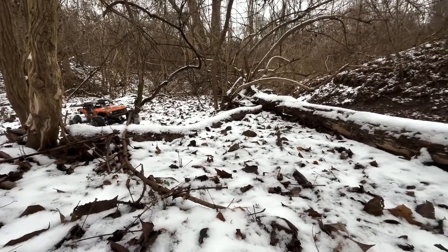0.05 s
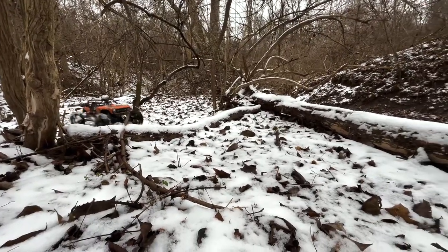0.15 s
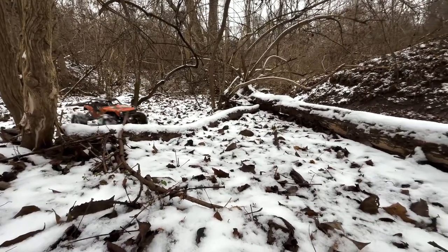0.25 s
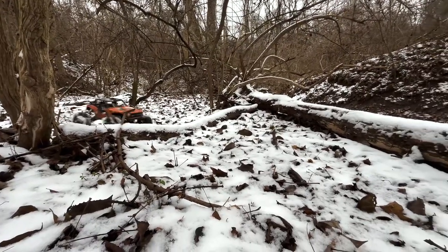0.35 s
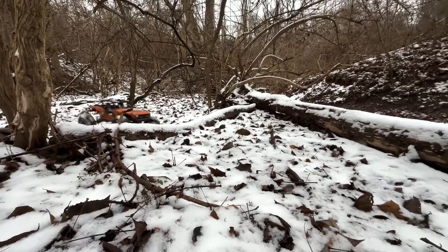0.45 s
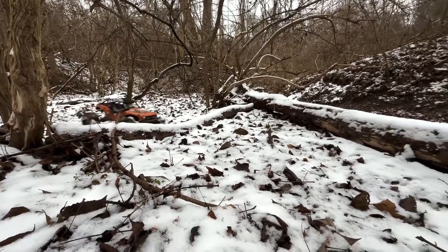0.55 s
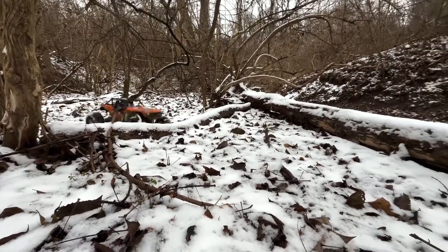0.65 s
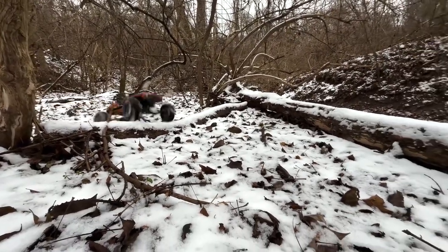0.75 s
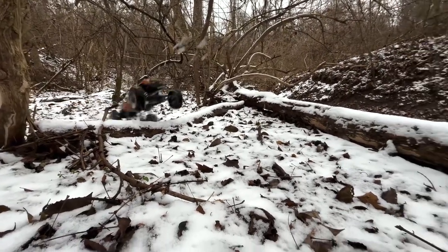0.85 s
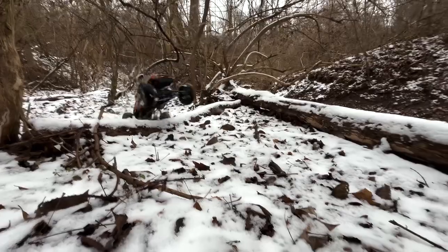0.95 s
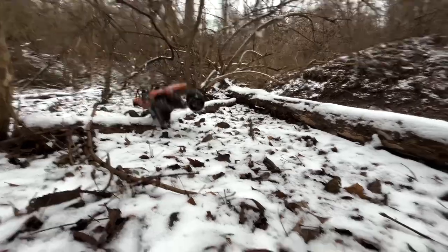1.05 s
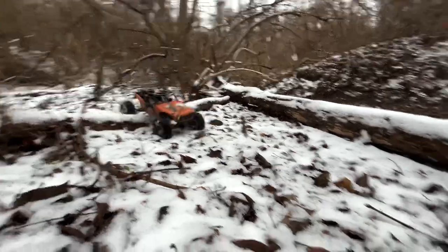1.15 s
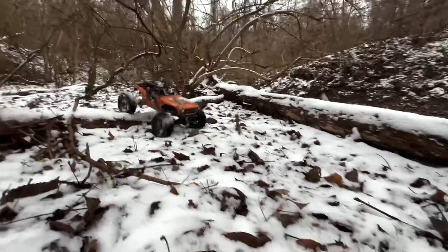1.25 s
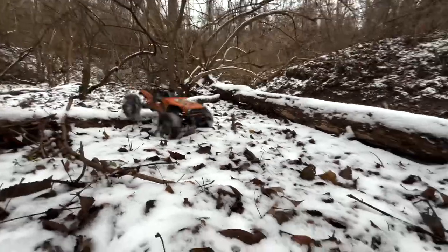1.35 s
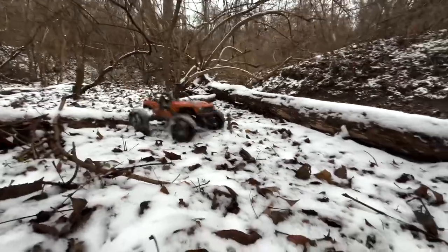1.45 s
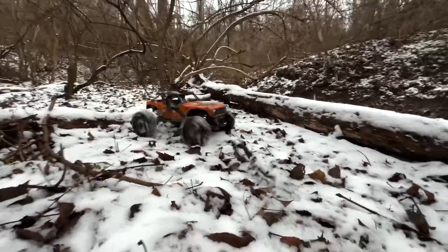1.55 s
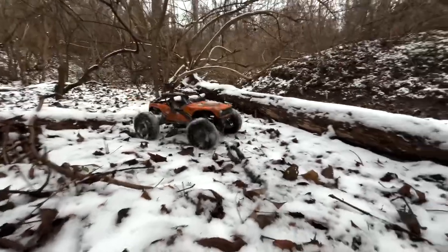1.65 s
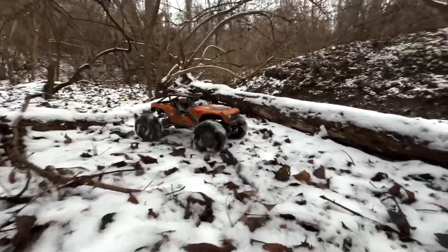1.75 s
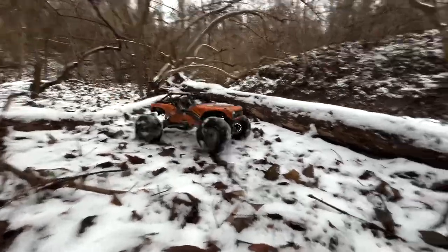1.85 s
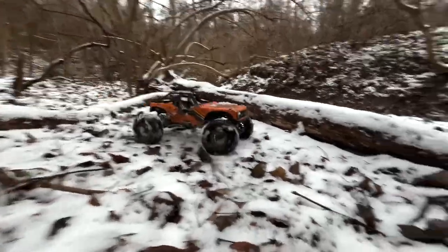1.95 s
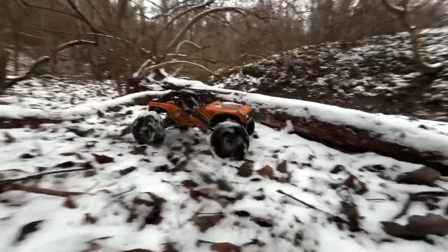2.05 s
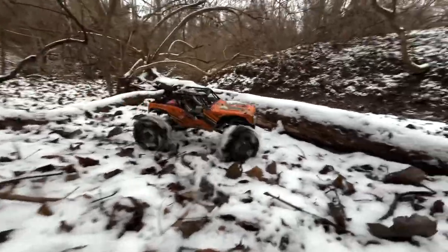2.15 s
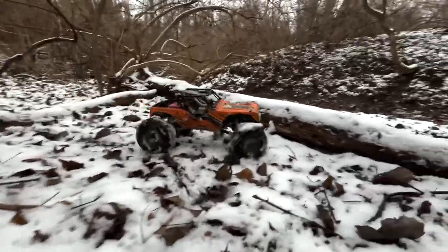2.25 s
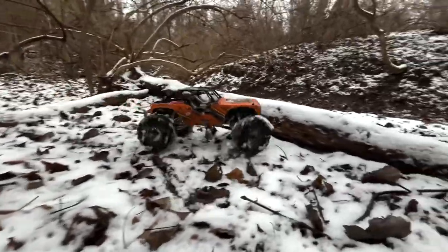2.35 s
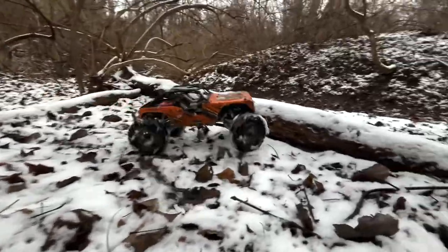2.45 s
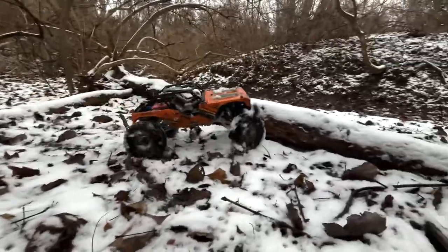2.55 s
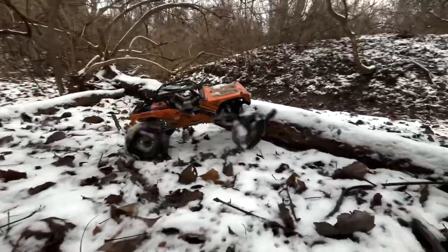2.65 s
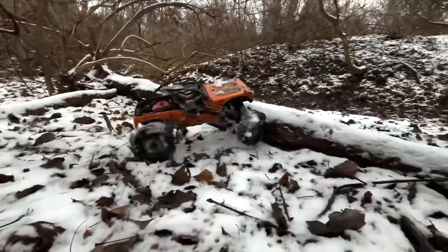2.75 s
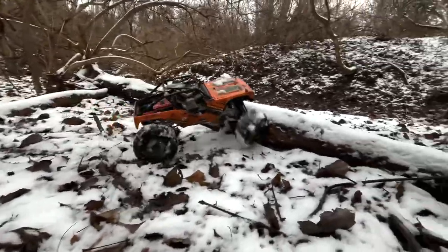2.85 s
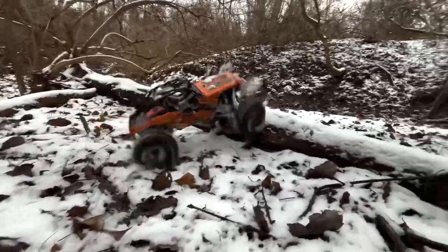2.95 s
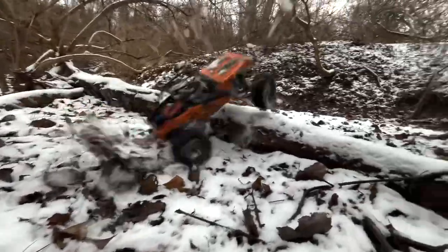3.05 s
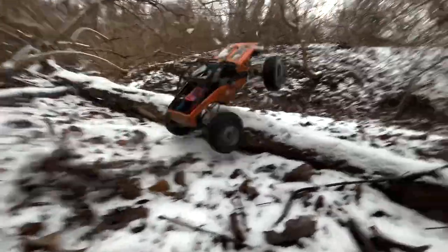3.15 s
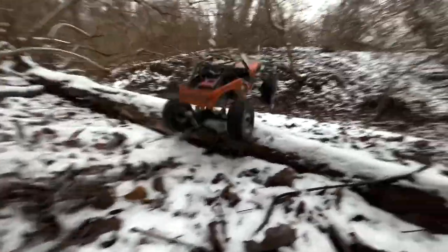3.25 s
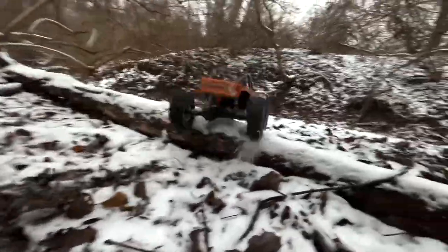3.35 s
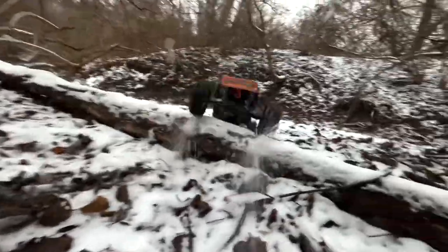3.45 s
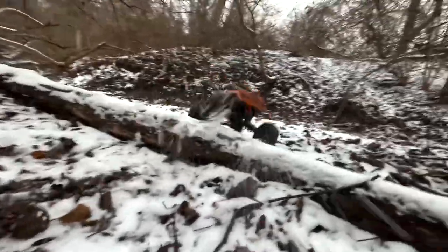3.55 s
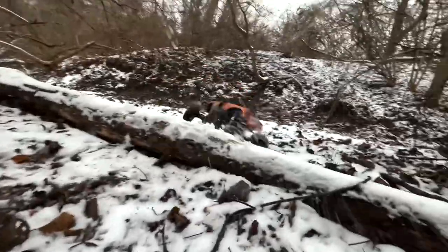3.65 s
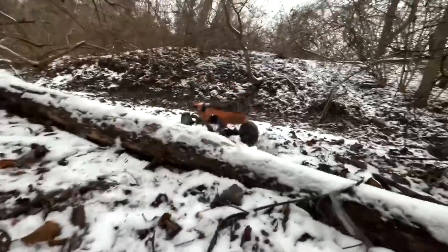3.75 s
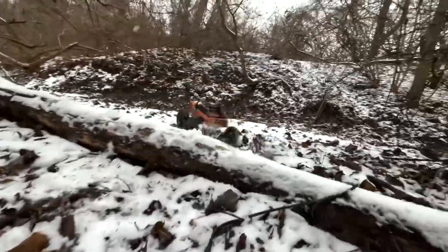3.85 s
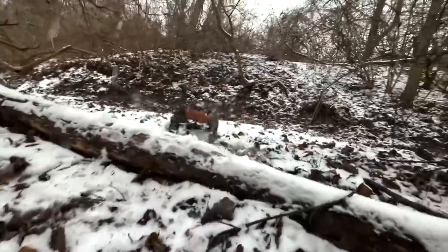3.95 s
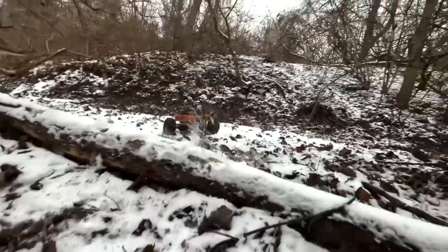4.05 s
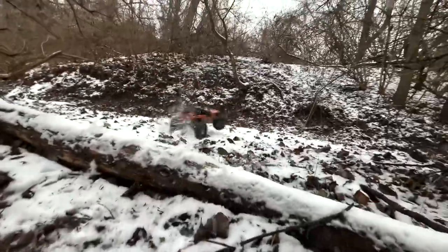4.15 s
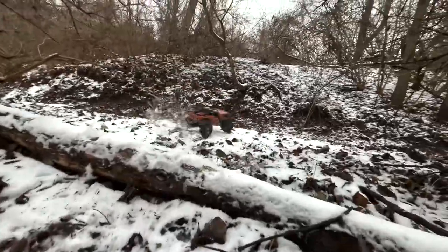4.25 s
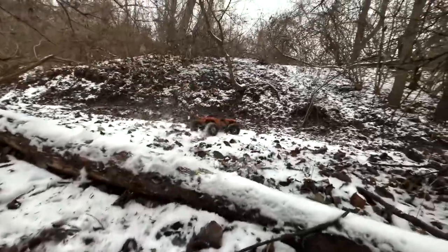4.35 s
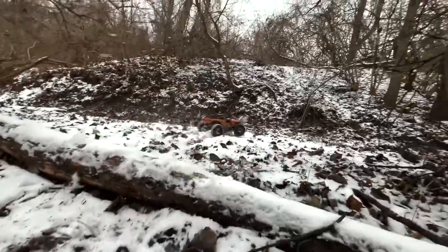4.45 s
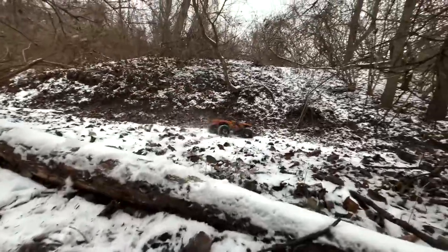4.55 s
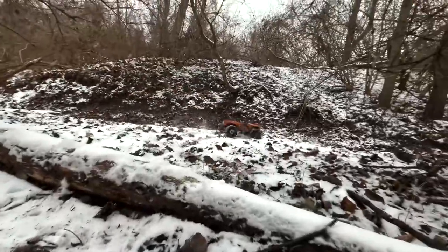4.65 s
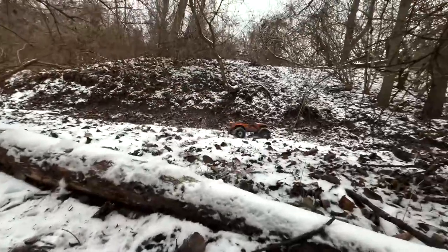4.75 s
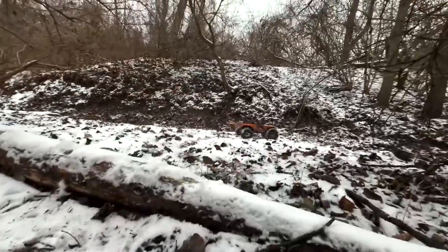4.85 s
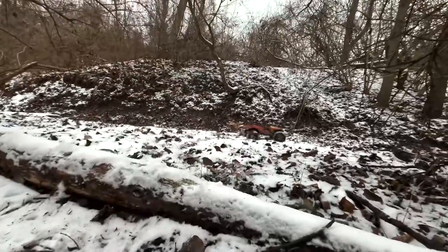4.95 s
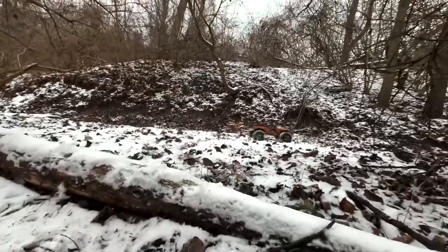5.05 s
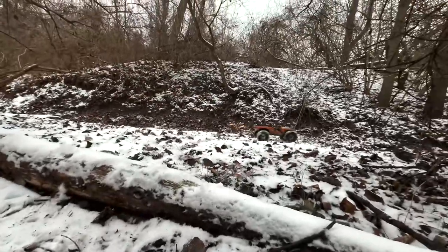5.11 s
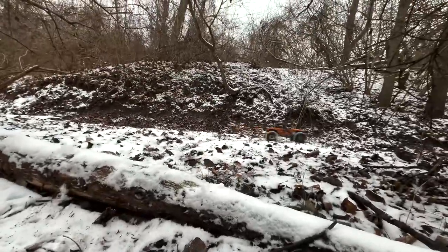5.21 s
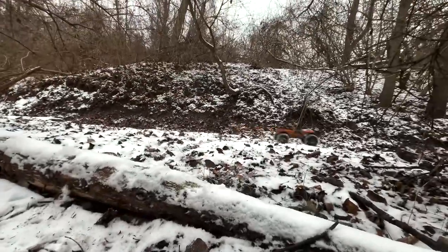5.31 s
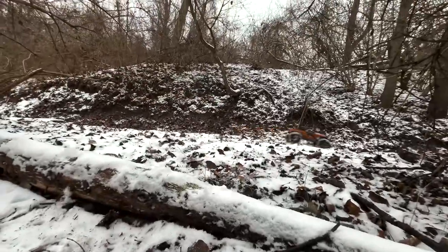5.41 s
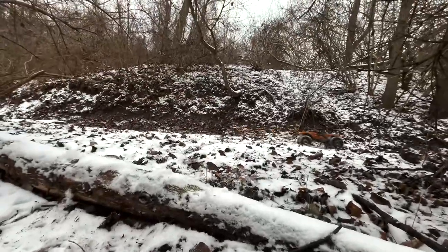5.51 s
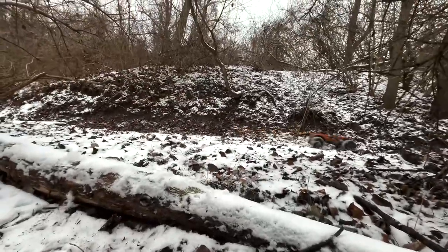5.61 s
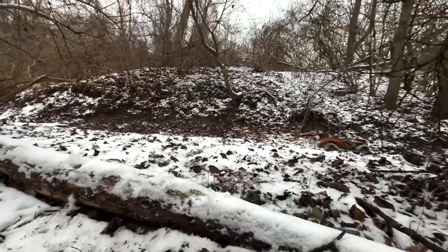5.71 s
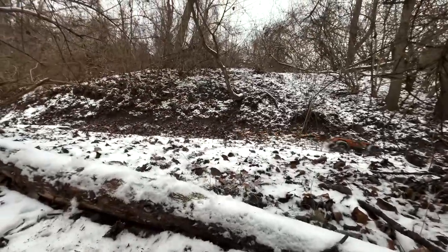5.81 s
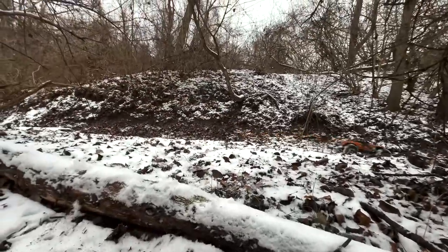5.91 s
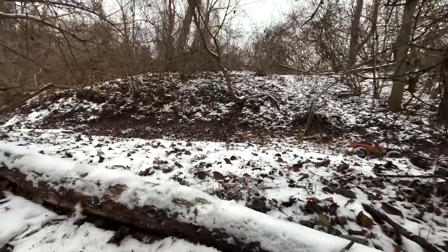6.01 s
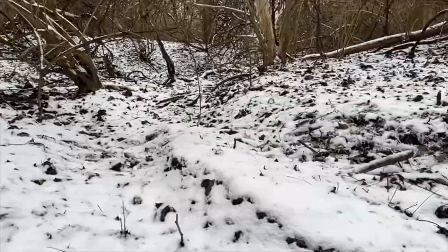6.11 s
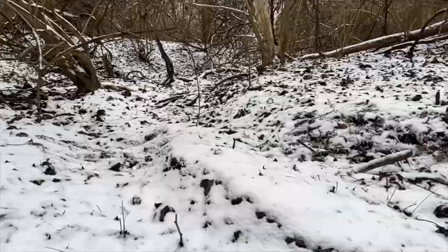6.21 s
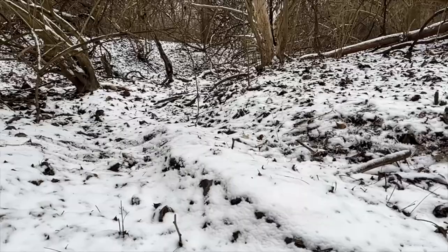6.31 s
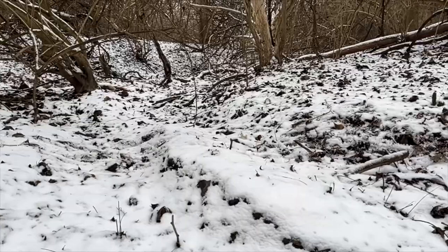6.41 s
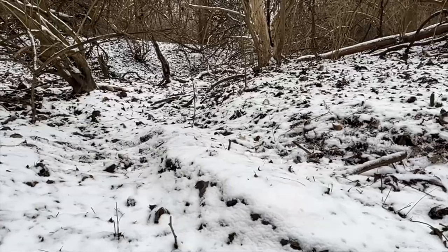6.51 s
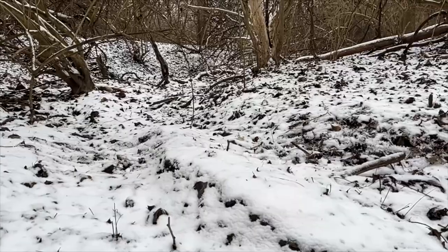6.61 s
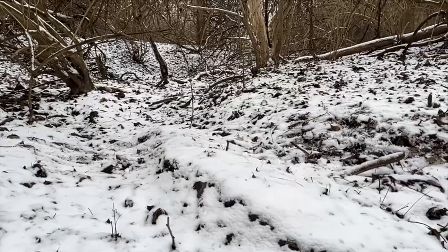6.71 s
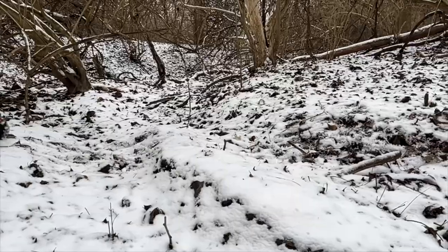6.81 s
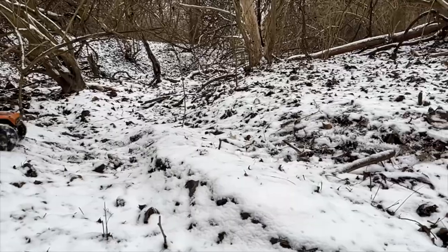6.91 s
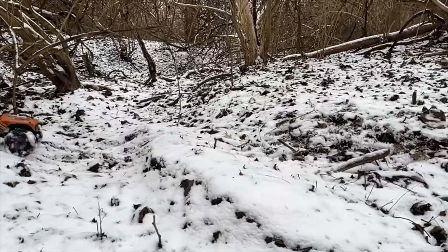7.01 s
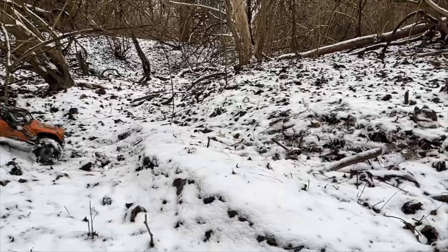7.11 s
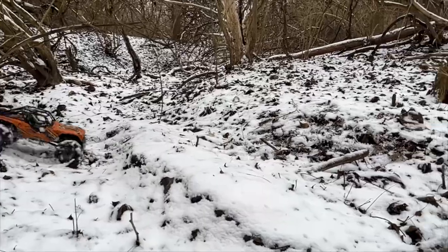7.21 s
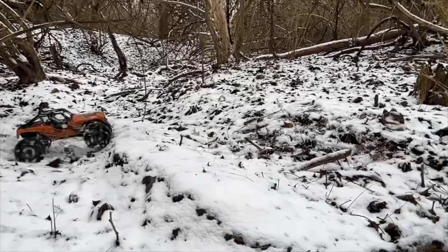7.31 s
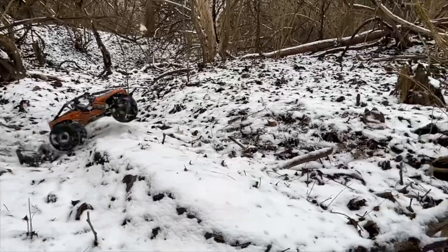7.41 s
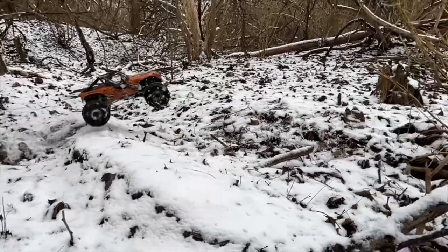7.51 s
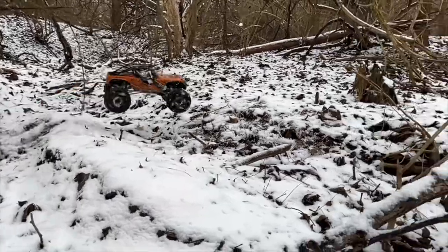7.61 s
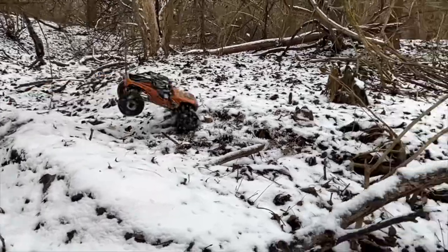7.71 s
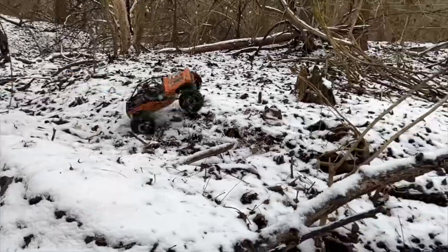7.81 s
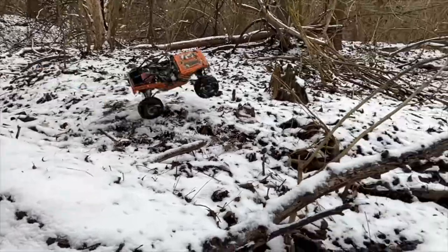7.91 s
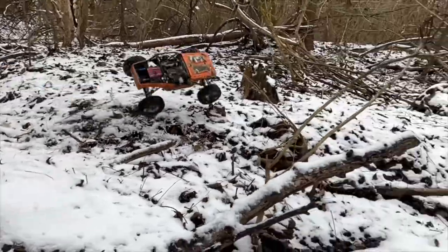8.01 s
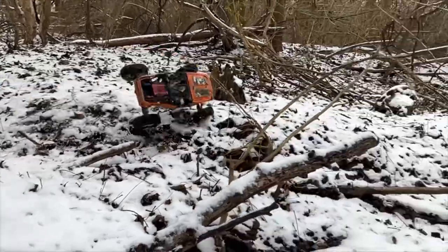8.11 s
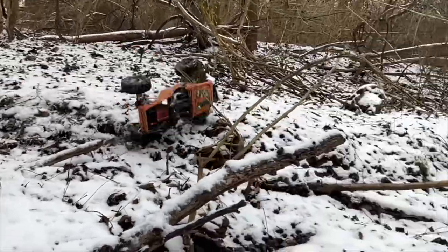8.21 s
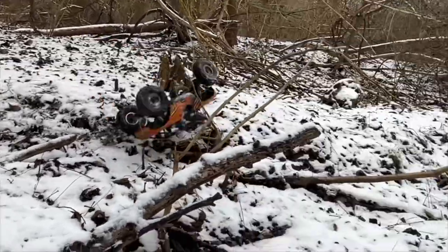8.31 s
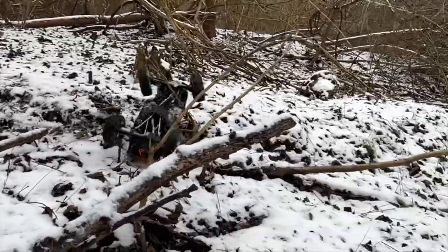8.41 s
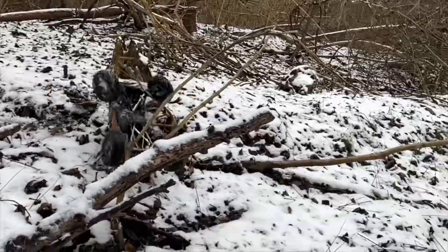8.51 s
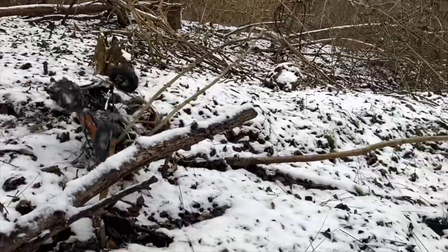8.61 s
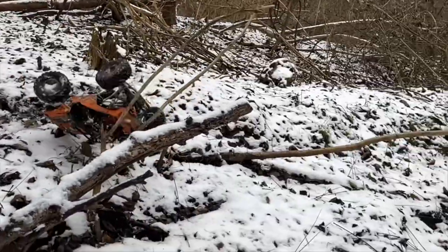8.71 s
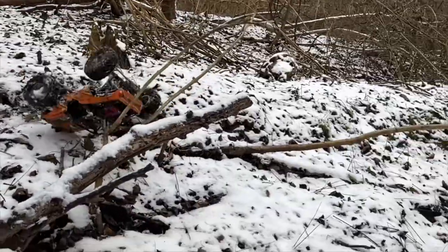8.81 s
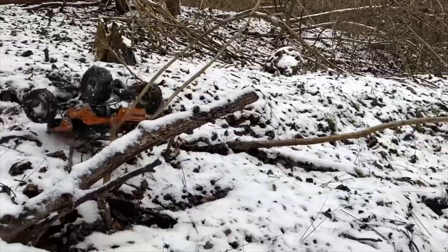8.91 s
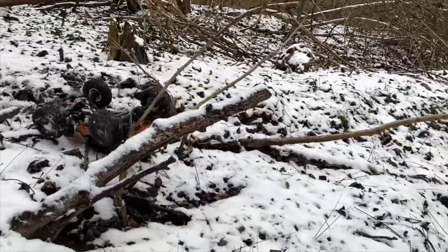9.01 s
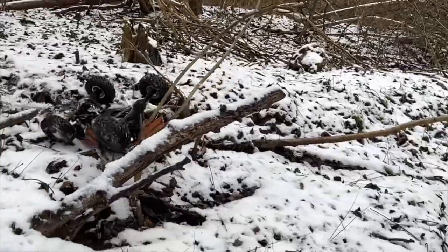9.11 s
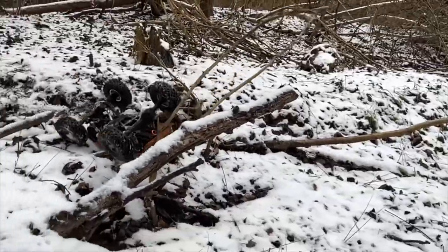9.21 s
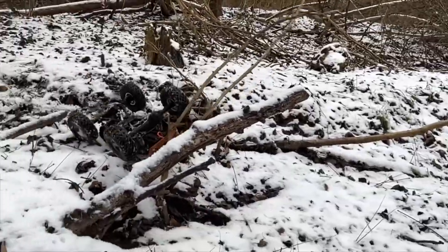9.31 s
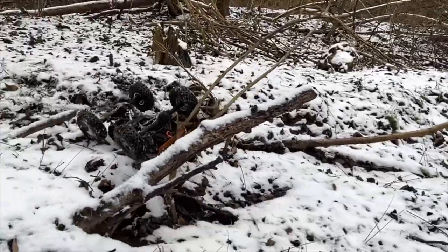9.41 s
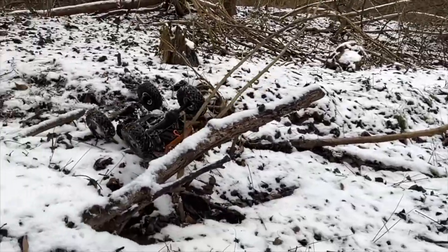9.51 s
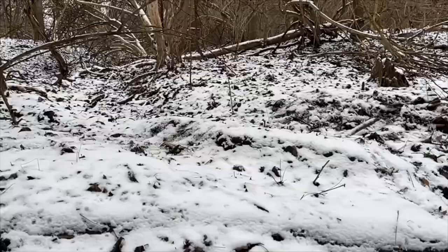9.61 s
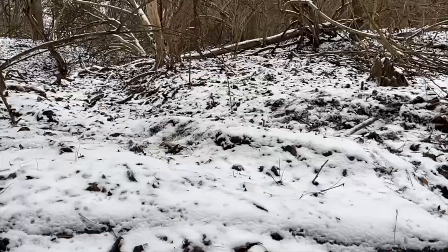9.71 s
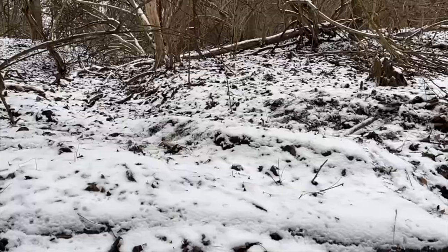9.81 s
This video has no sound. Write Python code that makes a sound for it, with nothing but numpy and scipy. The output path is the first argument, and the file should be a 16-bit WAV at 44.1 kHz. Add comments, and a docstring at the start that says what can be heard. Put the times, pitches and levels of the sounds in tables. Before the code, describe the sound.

A small electric remote-control car crawls over snow and leaves in a wood, with soft gear rasp, dull tyre crunch and faint distant traffic. At 0.7 seconds a throttle burst brings a rising gear whine and thin high whistle, followed by a knock at 1.1. The car creeps on, then surges loudly from 2.9 to about 4.5 seconds, its plastic chassis knocking over logs and slack gears clacking. It grows quieter and moves right, the drive juddering as wheels slip at 5.2. At 6.1 the listening position changes abruptly and the car is quiet, slightly left. Strong bursts run from 7.3 to 8.7 seconds with hard knocks and landing thumps. A short hollow scrape comes at 8.5, a sharp twig snap at 8.8, then smaller snaps. From 9.3 the steering servo buzzes faintly, and at 9.6 driving resumes suddenly for a moment.

```python
"""A small electric model car climbs logs and crosses snow and leaves in a wood, over distant traffic.
It sets off with gears whining and rasping on the throttle, speed controller whistling and tyres crunching.
From 3 s the chassis knocks over logs and slack gears clack; at 5.2 s slipping wheels shake the driveline.
At 6.1 s the scene cuts and the car is heard from another position: bursts, a scrape, snapping twigs.
At 9.3 s it lies on its roof, steering servo buzzing; after a last cut it is briefly driving again."""
import sys
import numpy as np
from scipy import signal
from scipy.fft import rfft, irfft, next_fast_len
from scipy.io import wavfile
from scipy.ndimage import uniform_filter1d, map_coordinates

SR = 44100
rng = np.random.default_rng(int(sys.argv[2]) if len(sys.argv) > 2 else 0)


def waveform_to_disk(signal):
    """Save audio, clipped to [-1, 1], as 16-bit WAV at the path in sys.argv[1]."""
    frames = np.transpose(np.atleast_2d(signal))
    scaled = np.clip(frames, -1, 1) * 32767
    samples = np.round(scaled).astype(np.int16)
    wavfile.write(sys.argv[1], SR, samples)


N = 434826

# gear whine: t/s, tooth rate f/Hz, tone level over the rattle/dB
GEAR_MESH = [(0, 564, -16), (.45, 558, -22), (.66, 1624, -6), (.7, 1760, -2), (.74, 1926, -3),
             (.8, 1860, 7.5), (.85, 2030, 14.5), (.88, 1800, -5), (.92, 1650, -3), (1.0, 1514, 1),
             (1.04, 800, -22), (1.2, 1120, 1), (1.27, 1800, -2), (1.35, 1340, 11), (1.395, 1800, 6.5),
             (1.42, 1560, 3), (1.49, 1350, -6), (1.6, 788, -1.5), (2.17, 700, -4.5), (2.27, 506, -15),
             (2.38, 396, -1.5), (2.46, 423, 4), (2.5, 594, -15), (2.57, 390, -7), (2.62, 590, -3),
             (2.8, 520.6, -2), (2.86, 296, -3), (2.89, 1517, 0), (2.92, 1900, -7), (2.95, 2010, -3),
             (2.962, 1520, 10), (3.015, 1575, 7), (3.03, 1967, 7), (3.085, 2196, 4.5), (3.11, 1840, 4),
             (3.21, 1654, -7), (3.245, 1765, 11), (3.275, 2224, 9), (3.292, 2022, 1), (3.36, 1632, 0),
             (3.75, 1597, -11), (3.81, 1656, 13.5), (3.83, 2020, -2.5), (3.88, 1917, 4), (3.92, 1541, -4),
             (4.09, 1404, -5), (4.13, 1660, 8.5), (4.15, 1550, 4), (4.3, 1373, -37), (4.41, 1049, -9),
             (4.435, 1850, 13), (4.46, 2320, -15), (4.53, 2240, -1), (4.6, 850, -19), (4.95, 900, -6.5),
             (5.03, 1338, -18), (5.05, 1400, 8), (5.075, 1442, 8), (5.095, 1915, -2), (5.17, 1870, -12),
             (5.213, 1740, 5), (5.24, 1530, 7), (5.48, 1552, 5.5), (5.5, 1900, -13), (5.555, 1492, 9),
             (5.595, 1470, -1), (5.71, 1540, 2), (5.73, 762.4, -8), (6.08, 776, -28), (6.09, 1400, 2),
             (6.25, 1376, 5.5), (6.45, 1397, -5), (6.55, 939, -10), (6.9, 1150, -6.5), (6.98, 1380, 3),
             (7.05, 1367, 7.5), (7.11, 1534, 9), (7.25, 1650, -8), (7.28, 2070, 0), (7.315, 1773, 17.5),
             (7.34, 1815, 8.5), (7.36, 1980, 6), (7.4, 1850, 3.5), (7.47, 2110, 5.5), (7.53, 1660, 2.5),
             (7.6, 1434, -5), (7.715, 1744, 2), (7.79, 1720, 3), (7.86, 1359, 4), (8.05, 1360, -3),
             (8.3, 1410, -2.5), (8.38, 1764, -16), (8.5, 1290, -2.5), (8.85, 862, -28), (9.643, 500, -44),
             (9.646, 1350, 5.5), (9.86, 1350, 2)]
# resonances of gearbox, housing and loose driveline parts: f/Hz, width/Hz, level/dB
GEARBOX_MODES = [(2800, 340, -3.5), (3900, 880, 15.5), (6400, 320, 14.5), (11300, 2000, 14.5)]
HOUSING_MODES = [(910, 350, -9.5), (1036, 150, -8.5), (1344, 60, 1), (1601, 126, 7), (1962, 270, -5)]
CHATTER_MODES = [(2666, 270, 0.5), (3180, 270, -1.5)]
# EQ of the gear rasp and the motor hiss: f/Hz, level/dB
RASP_EQ = [(1300, -20), (2200, 1.5), (2750, -1), (3300, -0.5), (4000, -3.5), (4700, -4.5), (5500, -16),
           (6500, -12), (9000, -61.5)]
HISS_EQ = [(3240, -6.5), (5500, -4.5), (6260, -1.5), (6800, -3.5), (8560, -8), (9750, -4.5), (11300, -3),
           (14200, -12.5), (14800, -15.5), (15500, -43)]
def drivetrain(rattle_db, rasp_db, hiss_db):
    """Teeth sing in fits and rattle the housing; worn gears rasp and chatter; the motor hisses."""
    teeth_hz, tone_db = curves(GEAR_MESH)
    slip = judder()
    speed = 1 - .085 * slip + .015 * wobble(60) + .018 * wobble(300)  # backlash shakes the speed
    phase = 2 * np.pi * np.cumsum(teeth_hz * speed) / SR
    load_db = 1.45 * wobble(35) + 0.89 * wobble(120)  # lugs and bumps load the gears unevenly
    whine = amp(4 * slip) * unit(amp(1.5 * wobble(30)) * tooth_partial(phase))  # louder as teeth labour
    overtones = sum(amp(-1.5 * k + 3 * wobble(40)) * tooth_partial(k * phase) for k in range(2, 7))
    squeal_db = -2.5 + 0.44 * tone_db + 12 * np.log2(teeth_hz / 2000)  # opens up at high speed
    squeal = amp(squeal_db) * unit(resonate(overtones, GEARBOX_MODES))
    rattle = amp(1.2 * wobble(30)) * resonate(grit(1500, spread_db=5, bed=1.5, patchy_db=2), HOUSING_MODES)
    tooth_pulse = 1 + 0.11 * np.sin(phase)
    rasp = coloured(tooth_pulse * grit(400, spread_db=6, bed=2.7, patchy_db=0), RASP_EQ)
    chatter = amp(-5) * unit(resonate(grit(140, spread_db=3, bed=.6, patchy_db=3), CHATTER_MODES))
    hiss = coloured(tooth_pulse * grit(1500, spread_db=3, bed=1.56, patchy_db=2.5), HISS_EQ)
    body = amp(rattle_db - 3.5) * (amp(-2.5 * np.abs(slip)) * unit(rattle) + amp(tone_db) * whine)
    edge = amp(rasp_db - 3) * (rasp + chatter + squeal) + amp(hiss_db - 0.5) * hiss
    return unit(amp(load_db)) * (body + edge)


def tooth_partial(phase):
    """Uneven teeth add a quick flutter to a partial's level and phase."""
    return (1.25 + wobble(120)) * np.sin(phase) + wobble(120) * np.cos(phase)


def judder():
    """Slipping wheels briefly rock the driveline; +1 is the slow point of each swing."""
    start_s, slowest_s, end_s, rock_hz = 5.215, 5.285, 5.48, 21.7
    t = np.arange(N) / SR
    return (t > start_s) * (t < end_s) * np.cos(2 * np.pi * rock_hz * (t - slowest_s))


# part-throttle bed, near and far: t/s, rasp level/dB, hiss offset/dB, crunch offset/dB
CRUISE = [(0, -57.5, -7, -1.5), (.6, -54.5, -11, -2.5), (1.03, -65, 7.5, 11.5), (1.07, -48, 3, -7.5),
          (1.34, -47.5, -3.5, -8.5), (1.62, -55.5, 3.5, 5), (1.7, -49, -0.5, 5), (2.24, -50, 0, 5),
          (2.3, -50, -2.5, 5), (2.41, -61, 1, 15.5), (2.63, -52.5, -6.5, -0.5), (2.86, -53, 0.5, 8),
          (2.94, -43, -9, -2), (3.05, -42.5, 3.5, -9.5), (3.95, -48, 7, -26.5), (4.33, -52.5, -3.5, -35),
          (5.03, -57, -3.5, -1.5), (6.08, -59, -3, 3), (6.085, -56, -14, 0), (7.0, -50, -14, -8),
          (7.6, -46.5, -3, -36), (8.05, -45, -3, 3), (8.45, -44, 1, 7.5), (8.75, -49, -4, 12.5),
          (8.85, -65, -5.5, -24), (9.28, -57.5, 0, 7.5), (9.39, -81.5, 7, -18), (9.643, -86, 1, -3.5),
          (9.646, -55.5, -12, 2), (9.86, -51.5, -15.5, -4)]
# throttle bursts: t/s, hold/s, rise/s, fall/s, rasp level/dB, rattle offset/dB, crunch offset/dB
BURSTS = [(.46, 0.012, 0.12, 0.11, -50.5, -19, -30), (0.682, 0.27, 0.046, 0.043, -36, -1, -5),
          (1.36, 0.087, 0.63, 0.23, -47.5, -25, 5.5), (2.235, 0.024, 0.13, 0.2, -50, 14.5, -11),
          (2.48, 0.017, 0.23, 1, -49.5, 7, 7), (2.926, 0.168, 0.038, 0.039, -25.5, -2.5, -3.5),
          (3.22, 0.13, 0.24, 0.36, -29.5, -6, 0.5), (3.458, 0.22, 0.87, 0.2, -42.5, 14.5, 1),
          (3.766, 0.11, 0.059, 0.13, -36.5, 4, -17), (3.991, 0.01, 0.094, 0.027, -40, 8, 1.5),
          (4.12, 0.026, 0.17, 0.39, -35.5, -7, -9), (4.425, 0.068, 0.11, 0.17, -38, -30, -6),
          (5.052, 0.14, 0.051, 0.15, -49.5, 9.5, -8), (5.239, 0.37, 0.088, .2, -52, 7, -16),
          (6.9, 0.39, 1.4, 0.089, -49.5, -25, -12), (7.04, 0.032, 0.19, 0.32, -54.5, 11.5, -5),
          (7.3, .17, 0.28, 0.26, -32, -12, -3), (7.54, 0.027, 0.037, 0.061, -44.5, 14, -4),
          (7.717, .12, 0.048, 0.21, -32.5, -1, -1), (8.56, 0.076, 0.64, 0.19, -31.5, 1.5, -1.5),
          (8.721, 0.09, 0.15, 0.042, -43.5, 3, 6.5), (8.945, 0.031, 0.065, 0.015, -47.5, 2.5, 6.5),
          (9.006, 0.0174, 0.013, 0.057, -44, 4, 10.5)]
RAMP_DB = 20  # covered in a burst's rise or fall time
def throttle():
    """Bursts add their power to the cruise, riding the rattle, rasp, hiss and crunch faders (dB)."""
    t = np.arange(0, N / SR + .001, .001)
    times, *columns = np.transpose(CRUISE)
    cruise_db, hiss_offset, tyre_offset = (np.interp(t, times, column) for column in columns)
    start, hold, rise, fall, burst_db, rattle_offset, crunch_offset = np.transpose(BURSTS)[..., None]
    shape_db = swell(start, hold, RAMP_DB / rise, RAMP_DB / fall, t)

    def power_sum(bed_db, peaks_db):
        return 10 * np.log10(amp(bed_db) ** 2 + np.sum(amp(peaks_db + shape_db) ** 2, axis=0))

    rattle = power_sum(cruise_db + 4.5, burst_db + rattle_offset)
    rasp = power_sum(cruise_db, burst_db)
    hiss = rasp + hiss_offset + 0.5 * (1 - amp(cruise_db - rasp))  # a touch more at full throttle
    crunch = power_sum(cruise_db + tyre_offset, burst_db + crunch_offset)
    return curves(np.transpose([t, rattle, rasp, hiss, crunch]))


# EQ of the tyre crunch: f/Hz, level/dB
CRUNCH_EQ = [(70, -36), (120, -2), (220, -8), (320, -1.5), (480, -5), (650, -10), (900, -3.5), (1200, -5.5),
             (2200, -62.5)]
def tyres(crunch_db):
    """Tyres crush snow and leaves into a dull, grainy crunch."""
    crunch = coloured(grit(150, spread_db=-0.5, bed=1.65, patchy_db=2.5), CRUNCH_EQ)
    return amp(crunch_db - 5.5 + 0.91 * wobble(25)) * crunch


# whistle fader: t/s, level/dB
WHISTLE_LEVEL = [(0, -71.5), (.65, -66), (.8, -37), (1.03, -73), (1.38, -50), (1.6, -62), (2.3, -55.5),
                 (2.9, -66), (3.33, -32.5), (3.5, -43.5), (4.2, -50.5), (4.6, -60), (5.68, -61),
                 (5.71, -56), (6.07, -56.5), (6.12, -98), (6.5, -59), (7.2, -61), (7.35, -100),
                 (9.644, -102), (9.648, -67), (9.86, -66)]
WHISTLE_HZ, HZ_PER_OCTAVE, CRAWL_MESH_HZ = 6030, 105, 790  # crawl pitch, its rise, crawl tooth rate
def speed_controller():
    """A thin whistle follows the motor's speed; it blurs and flickers as the motor runs fast."""
    db, = curves(WHISTLE_LEVEL)
    octaves = uniform_filter1d(np.log2(curves(GEAR_MESH)[0] / CRAWL_MESH_HZ), size=1500)
    fast = np.clip(octaves / 1.2, 0, 1) ** 3
    hz = WHISTLE_HZ + HZ_PER_OCTAVE * octaves + 8 * wobble(15) + (18 + 130 * fast) * wobble(200)
    flicker_db = (2 + 1.5 * fast) * wobble(15)
    return np.sqrt(2) * amp(db + flicker_db) * np.sin(2 * np.pi * np.cumsum(hz) / SR)


# chassis hits on logs and ground, and twig snaps: t/s, level/dB, thud offset/dB
KNOCKS = [(1.1388, -15.5, -15), (2.7994, -27, -7), (2.92, -19.5, -23), (3.0462, -13.5, -5),
          (3.0934, -21.5, 10), (3.195, -12, 3), (3.236, -15, 3.5), (3.405, -21.5, 8.5), (3.8797, -12, -6.5),
          (4.66, -15, -21), (5.5512, -40.5, 3), (7.38, -25, 5), (7.4517, -16.5, -7), (7.475, -10, -12),
          (7.8329, -14.5, -6.5), (8.627, -37, 13), (9.0167, -40, -10), (9.034, -44, -12)]
TWIG_SNAPS = [(2.2618, -19, -34), (4.283, -16, -34), (8.774, -2.5, -24), (8.9014, -15, -43),
              (8.9983, -10.5, -45), (9.19, -28.5, -18), (9.21, -31, -20)]
# ring of the plastic chassis: f/Hz, level/dB, t60/s
CHASSIS_MODES = [(131.3, -10, 0.17), (187, 1.5, 0.036), (240, -3, 0.075), (324, 0.5, 0.065),
                 (521, 1, 0.035), (670, -11.5, 0.021), (950, -6.5, 0.066), (1526, -13, 0.066)]
KNOCK_RISE_S, SNAP_RISE_S = .004, .0002  # snow and leaves cushion the knocks
def knocks_and_snaps():
    """Each hit is a crack and a thud in the chassis; cushioned hits swell into a crunch."""
    cracks, thuds = np.zeros((2, N + SR))
    t = np.arange(SR // 8) / SR
    decay = amp(-60 * t / 0.046) + amp(2 - 60 * t / 0.008)
    for hits, rise in (KNOCKS, KNOCK_RISE_S), (TWIG_SNAPS, SNAP_RISE_S):
        for start, db, thud_db in hits:
            span = slice(round(start * SR), round(start * SR) + len(t))
            cracks[span] += amp(db - 15.5) * decay * (1 - np.exp(-t / rise)) * rng.standard_normal(len(t))
            ring = 0
            for hz, mode_db, t60 in CHASSIS_MODES:
                envelope = amp(mode_db + rng.normal(0, 4.5) - 60 * t / t60)
                detune = amp(rng.normal(0, 0.51))
                ring += envelope * np.sin(2 * np.pi * hz * detune * t)
            thuds[span] += amp(db + thud_db - 5.5) * ring * (1 - np.exp(-t / 0.002))
    cracks = signal.lfilter([.4], [1, -.65], cracks[:N])  # wood and plastic soften the treble
    cracks = filtered(cracks, lambda hz: 1j * hz / (300 + 1j * hz) / (1 + (hz / 14200) ** 16))
    return cracks + filtered(thuds[:N], lambda hz: (1j * hz / (90 + 1j * hz)) ** 2)


# gear clacks: t/s, level/dB
GEAR_CLACKS = [(2.9018, -13.5), (3.463, -15.5), (3.4765, -21), (3.4968, -11), (3.5069, -12),
               (3.5522, -17.5), (3.6003, -23.5), (3.7624, -19.5), (3.8055, -28), (4.069, -48)]
def gear_clacks():
    """Slack gears give the housing a short push that rings it."""
    pulse = np.hanning(40) * np.sin(2 * np.pi * 1600 * np.arange(40) / SR)
    pushes = np.zeros(N)
    for start, db in GEAR_CLACKS:
        pushes[round(start * SR):][:len(pulse)] += amp(db + 9.5) * pulse
    return resonate(pushes, HOUSING_MODES)


# drag along a branch: t/s, hold/s, level/dB
SCRAPES = [(8.522, 0.072, -30)]
# hollow body shell: f/Hz, width/Hz, level/dB
SHELL_MODES = [(895, 180, 10), (1014, 140, 6.5)]
def shell_scrape():
    """Stick-slip grains ring the shell as it drags on a branch."""
    start, hold, db = np.transpose(SCRAPES)[..., None]
    shape_db = swell(start, hold, rise_db_s=382.5, fall_db_s=161, t=np.arange(N) / SR)
    ring = unit(resonate(grit(440, spread_db=-0.5, bed=1, patchy_db=4.5), SHELL_MODES))
    return amp(np.max(db + shape_db, axis=0) + 5.5) * ring


# servo buzz: harmonic number, level/dB
SERVO_HARMONICS = [(3, -80), (5, -80), (6, -88), (10, -88), (30, -85), (31, -80), (32, -82)]
def servo(pulse_hz=368.4, start_s=9.3, end_s=9.643):
    """The stalled steering servo buzzes on exact multiples of its pulse rate."""
    t = np.arange(N) / SR
    buzz = sum(amp(db + 6.5 * wobble(5.5)) * np.sin(2 * np.pi * k * pulse_hz * t + rng.uniform(0, 2 * np.pi))
               for k, db in SERVO_HARMONICS)
    return amp(4) * buzz * (t > start_s) * (t < end_s)


# the car's pan path: t/s, left lead/samples, left-over-right level/dB
PAN_PATH = [(0, 10.5, 2), (.75, 11.5, 2), (.93, 7, -.5), (1.3, 11.5, 1.5), (1.4, 21, 0), (2.85, 24, 4),
            (2.92, 5.5, -2.5), (4.1, 6, -1.5), (5.1, -0.5, -6), (6.08, -7.5, -4), (6.085, 15.5, 3.5),
            (7, 13.5, 1.5), (7.4, 9, 0), (7.55, 5.5, -1), (8.9, 9, 2), (9.64, 10, 4), (9.646, 13.5, 4),
            (9.86, 15.5, 3.5)]
# left phase lead in the treble: f/Hz, before CUT_S/rad, after it/rad
TREBLE_LEAD = [(5500, 5.5, 6.3), (7000, 6.3, 5.3), (8300, 6.3, 3), (9800, 6.3, 0), (13600, 6.3, 0),
               (14300, 3.2, -3.1)]
# scattered sound: f/Hz, share of random phase
SCATTER = [(100, 0.04), (500, 0.24), (2000, 0.2), (5000, 0.5), (8000, 0.38), (13000, 0.2)]
CUT_S = 6.083  # the scene cuts to another listening position
def pan(x, scattered):
    """The car's bearing delays and shades one side; scattered sound loosens the stereo image."""
    hz, t, spectrum = signal.stft(x, SR, nperseg=512, noverlap=384)
    times, lead, pan_db = np.transpose(PAN_PATH)
    treble_hz, *leads = np.transpose(TREBLE_LEAD)
    early, late = (np.interp(hz, treble_hz, column)[:, None] for column in leads)
    delay_phase = 2 * np.pi * hz[:, None] * np.interp(t, times, lead) / SR
    phase = np.where(hz[:, None] > treble_hz[0], np.where(t < CUT_S, early, late), delay_phase)
    phase += scattered * np.pi * along(SCATTER, hz)[:, None] * blotches(spectrum.shape, bins=4, frames=10)
    shade_db = np.interp(t, times, pan_db) * np.interp(hz, [3000, 7000], [1, .3])[:, None]
    half = amp(shade_db / 2) * np.exp(.5j * phase)
    return signal.istft(np.array([spectrum * half, spectrum / half]), SR, nperseg=512, noverlap=384)[1][:, :N]


# traffic fader and the car's landing thumps: t/s, level/dB
TRAFFIC_LEVEL = [(0, -59), (1.0, -55.5), (2.8, -56), (3.55, -47.5), (3.9, -47.5), (4.3, -54.5), (6.07, -55),
                 (6.1, -62.5), (8.9, -57), (9.635, -62.5), (9.655, -48.5), (9.86, -51)]
LANDINGS = [(1.147, -40.5), (2.95, -42), (3.86, -39), (7.399, -45), (7.81, -39), (8.19, -46.5),
            (8.651, -36.5)]
# EQ of the rumble: f/Hz, level/dB
RUMBLE_EQ = [(28, -66), (47, -7), (75, -1.5), (94, -4), (125, -10.5), (220, -25.5), (290, -60.5),
             (480, -120)]
def rumble():
    """Distant traffic lays a near-mono low end; the same noise swells as the car lands."""
    start, db = np.transpose(LANDINGS)[..., None]
    thumps_db = db + swell(start, hold=0, rise_db_s=126, fall_db_s=109, t=np.arange(N) / SR)
    level_db = np.maximum(curves(TRAFFIC_LEVEL)[0], thumps_db.max(axis=0))
    mid, side = coloured(rng.standard_normal((2, N)), RUMBLE_EQ)
    return amp(level_db + 2.2 * wobble(28)) * (mid + amp(-16.5) * np.outer([1, -1], side))


# EQ of the wood's ambience: f/Hz, level/dB
HUSH_EQ = [(88, -46.5), (150, -7), (1250, -15.5), (1870, -4), (3150, -27), (8750, -23), (9450, -8.5),
           (11500, -36.5), (15000, -49.5)]
def woodland_hush():
    """A faint, wide bed of steady noise."""
    return amp(-71.5) * coloured(rng.standard_normal((2, N)), HUSH_EQ)


def amp(db):
    return 10 ** (np.asarray(db) / 20)


def unit(x):
    return x / np.sqrt(np.mean(x ** 2) + 1e-20)


def along(points, hz):
    """Read (f/Hz, value) points on a log axis."""
    f, values = np.transpose(points)
    return np.interp(np.log(hz + 1), np.log(f + 1), values)


def curves(table):
    """One value per sample for each column after the time."""
    times, *columns = np.transpose(table)
    return [np.interp(np.arange(N) / SR, times, column) for column in columns]


def swell(start, hold, rise_db_s, fall_db_s, t):
    """Rise to 0 dB at start, hold and fall; one row per event."""
    return -rise_db_s * np.clip(start - t, 0, None) - fall_db_s * np.clip(t - start - hold, 0, None)


def wobble(rate):
    """A smooth random curve, rate knots a second."""
    return map_coordinates(rng.standard_normal(int(N * rate / SR) + 4), [np.arange(N) * rate / SR])


def blotches(shape, bins, frames):
    """A smooth random field over frequency and time, rms 1."""
    field = uniform_filter1d(rng.standard_normal(shape), size=bins, axis=0)
    return unit(uniform_filter1d(field, size=frames, axis=1))


def grit(rate, spread_db, bed, patchy_db):
    """Uneven clicks on a noise bed, with blotches of random gain across the spectrum."""
    clicks = (rng.random(N) < rate / SR) * amp(spread_db * rng.standard_normal(N)) * rng.standard_normal(N)
    spectrum = signal.stft(unit(clicks) + bed * rng.standard_normal(N), nperseg=256)[2]
    gain = amp(patchy_db * blotches(spectrum.shape, bins=3, frames=6))
    return signal.istft(spectrum * gain, nperseg=256)[1][:N]


def filtered(x, response):
    """x times a complex response of frequency."""
    size = next_fast_len(N + SR // 2)
    return irfft(rfft(x, size) * response(np.fft.rfftfreq(size, 1 / SR)), size)[..., :N]


def coloured(x, eq):
    """x through an EQ curve, rms 1."""
    return unit(filtered(x, lambda hz: amp(along(eq, hz))))


def resonate(x, modes):
    """x through parallel resonances of alternating polarity."""
    return filtered(x, lambda hz: sum((-1) ** k * amp(db) * 1j * hz * width / (f*f - hz*hz + 1j * hz * width)
                                      for k, (f, width, db) in enumerate(modes)))


def scene():
    """The panned car over rumble and hush."""
    hits = pan(knocks_and_snaps() + gear_clacks(), scattered=0)  # a hit's first wave arrives unscattered
    rattle_db, rasp_db, hiss_db, crunch_db = throttle()
    car = drivetrain(rattle_db, rasp_db, hiss_db) + tyres(crunch_db)
    car += speed_controller() + shell_scrape() + servo()
    return pan(car, scattered=1) + hits + rumble() + woodland_hush()


def record(dry):
    """A brick-wall high cut at 15725 Hz."""
    return filtered(dry, lambda hz: hz < 15725)


dry = scene()
out = record(dry)
waveform_to_disk(out)
```